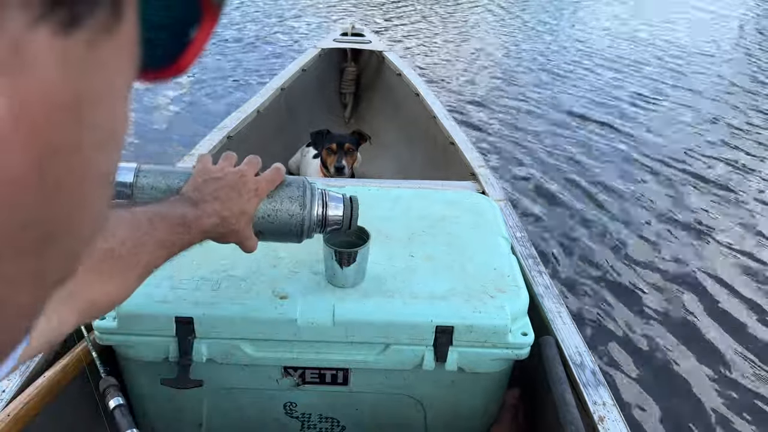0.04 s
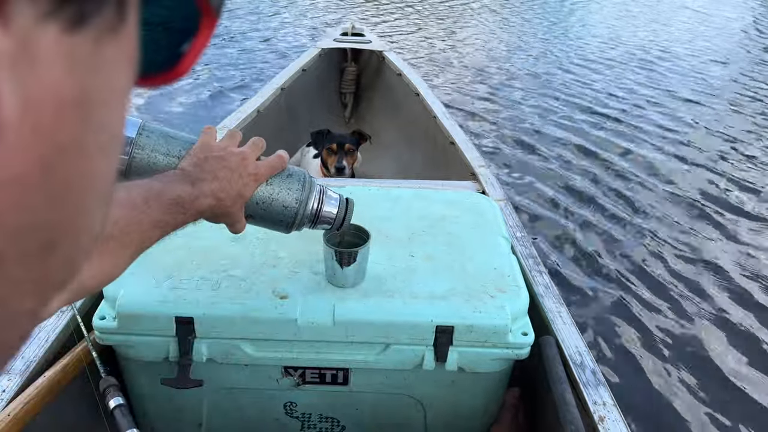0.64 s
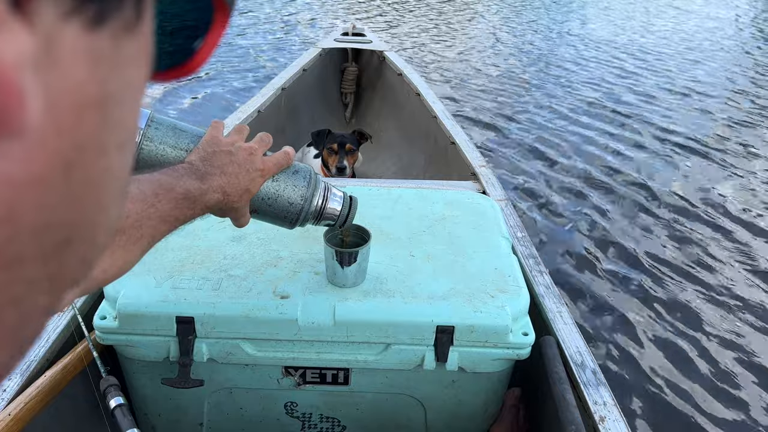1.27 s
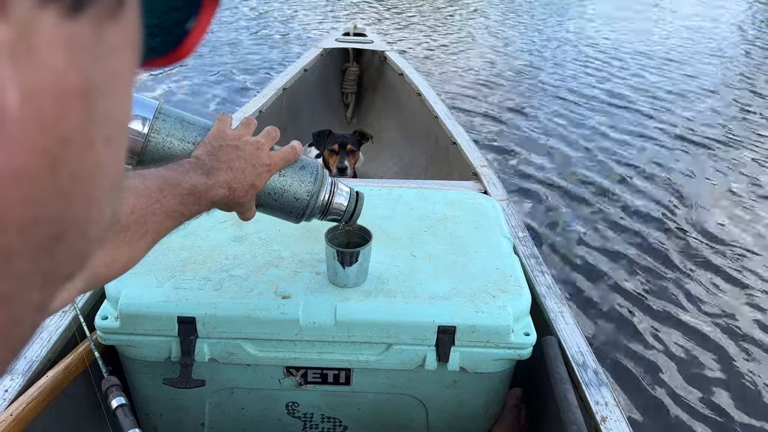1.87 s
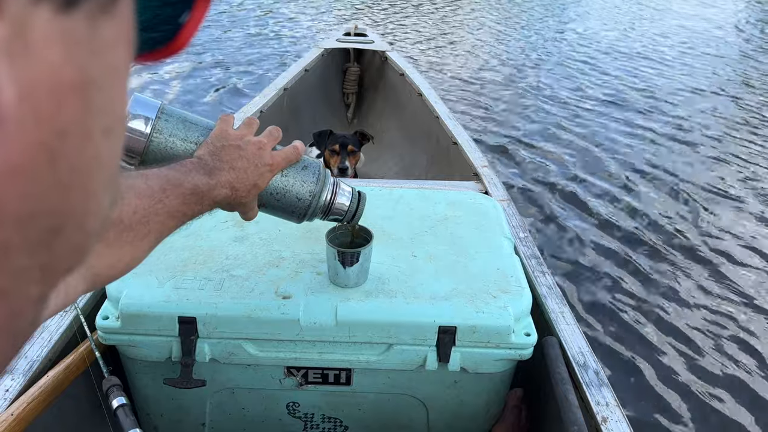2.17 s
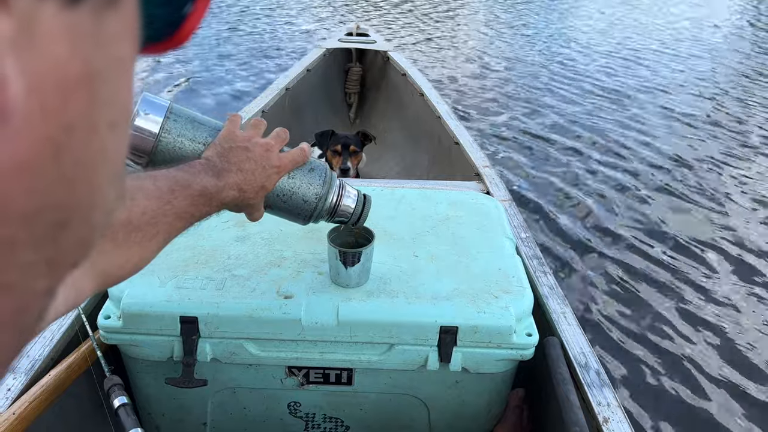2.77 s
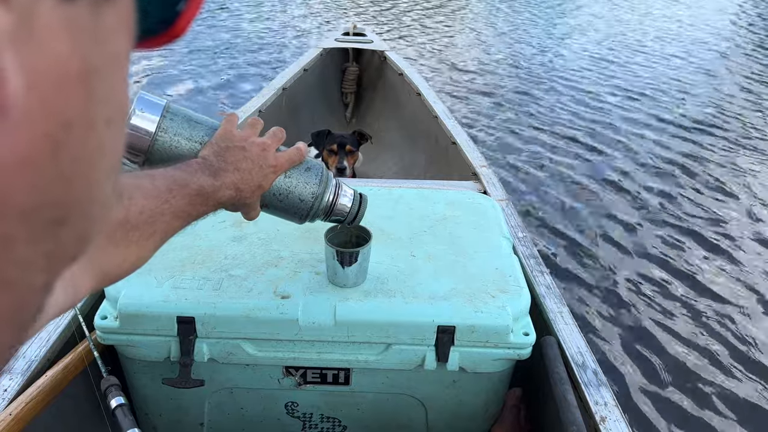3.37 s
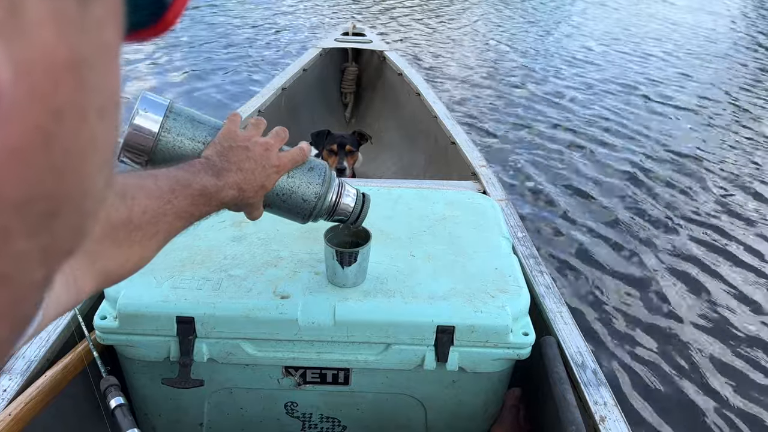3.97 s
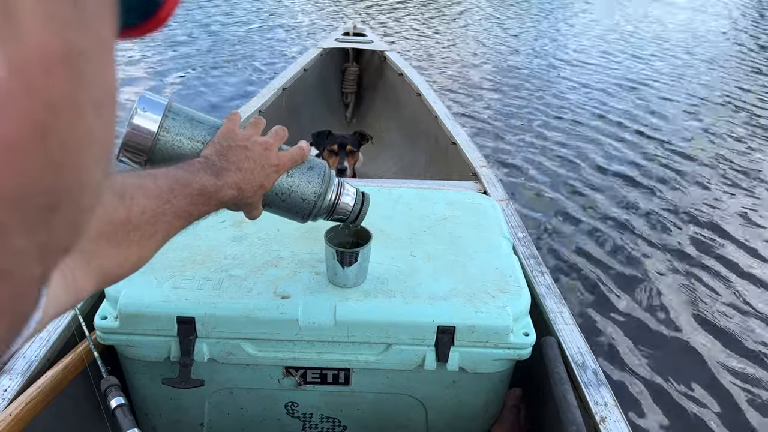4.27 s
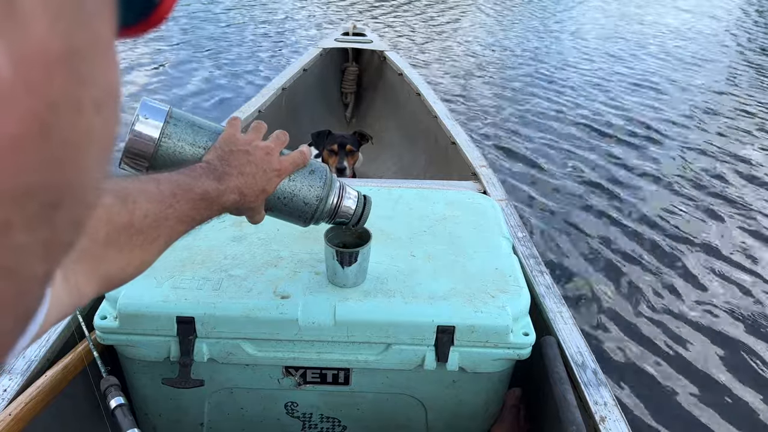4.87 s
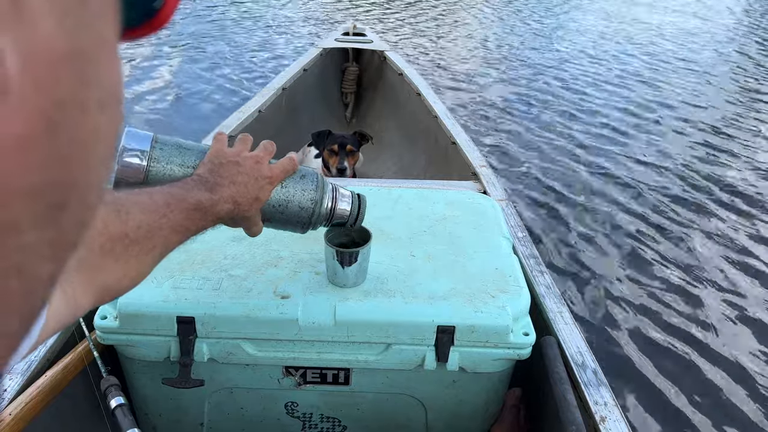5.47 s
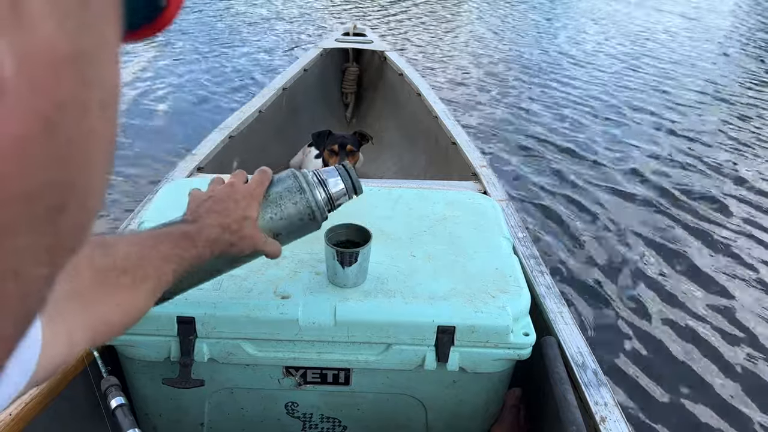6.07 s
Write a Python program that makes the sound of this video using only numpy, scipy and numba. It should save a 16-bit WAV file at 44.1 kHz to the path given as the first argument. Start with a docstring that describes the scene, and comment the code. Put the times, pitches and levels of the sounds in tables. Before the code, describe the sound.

A drink trickles from a flask into a small metal cup, plinking and gurgling, with wind rumbling on the microphone and faint insects.

```python
"""Coffee is poured in a thin stream from a steel flask into a small metal cup, in a canoe on a lake.
From the start, wind buffets the microphone while insects hiss and trill faintly on the shore.
After half a second the pour begins: trapped bubbles plink and gurgle, droplets tick, splashes spatter.
The cup's air column rings along and rises in pitch as the cup fills.
In the second half the wind gusts harder, and the stream thins out near the end."""
import sys
import numpy as np
from scipy import signal
from scipy.fft import rfft, irfft, next_fast_len
from scipy.io import wavfile
from numba import njit

SR = 44100
rng = np.random.default_rng(int(sys.argv[2]) if len(sys.argv) > 2 else 0)


def waveform_to_disk(signal):
    """Save audio, clipped to [-1, 1], as 16-bit WAV at the path in sys.argv[1]."""
    frames = np.transpose(np.atleast_2d(signal))
    scaled = np.clip(frames, -1, 1) * 32767
    samples = np.round(scaled).astype(np.int16)
    wavfile.write(sys.argv[1], SR, samples)


N = 274064
TIME = np.arange(N) / SR

# bed of rippled water and far trees, with a band of distant crickets: (frequency [Hz], gain [dB])
LAKE_EQ = [(300, 18.5), (800, -8), (1300, 5), (2200, 3), (3100, 1), (3500, 9), (3850, 14), (4250, -18),
           (6000, -24), (16000, -63)]
# airy insect chorus: (frequency [Hz], gain [dB])
CHORUS_EQ = [(2000, -35), (5200, -19.5), (7000, -12), (8000, 0.5), (9500, -3.5), (12800, 4.5), (14400, 6),
             (15800, 6.5), (17000, -39)]
# the chorus swells and eases off: (time [s], gain [dB])
CHORUS_FADER = [(0.1, 0), (0.27, -1.5), (0.5, 0.5), (0.82, -0.5), (1.02, 0.7), (1.8, 0.1), (2.15, -1),
                (2.65, 1), (3.05, -1), (3.47, 0), (4.07, -2.5), (4.47, 0.5), (4.72, -2), (5.03, -0.5),
                (5.45, -3), (6.0, -3.5), (6.2, -4)]
# thin whine of insects all round: (frequency [Hz], gain [dB])
WHINE_EQ = [(3000, -64), (5600, -32), (6000, 6.5), (6350, 13.5), (6900, 6.5), (9000, -99), (16000, 1)]
# the whine is strongest at first: (time [s], gain [dB])
WHINE_FADER = [(0.5, 2.5), (1.2, 1.5), (3.5, -1.5), (6.0, -0.5)]
# a far cricket trills about four times a second: (middle [s], level [dB], length [s])
TRILL_CUES = [(0.0, -54, 0.19), (0.216, -53.5, 0.19), (0.456, -48, 0.14), (0.711, -50, 0.15),
              (0.957, -52, .14), (1.214, -56, .16), (1.469, -54.5, .2), (1.739, -57.5, 0.19),
              (2.007, -58, .18), (2.269, -54.5, .18), (2.51, -53.5, 0.16), (2.834, -59, 0.16),
              (3.044, -56, 0.14), (3.305, -50.5, 0.12), (3.556, -49, 0.11), (3.797, -52, .12),
              (4.024, -55, 0.16), (4.244, -55.5, .14), (4.538, -56, 0.4), (4.866, -51, 0.17),
              (5.087, -60, .14), (5.307, -52.5, .16), (5.508, -52, .18), (5.788, -59, .15),
              (6.05, -51, .13)]

# the wind slackens, then gusts: (time [s], rumble level [dB], flutter level [dB])
WIND_FADERS = [(0.0, -31.5, -41.5), (0.3, -35.5, -46), (0.85, -34.5, -43.5), (1.2, -34.5, -45),
               (1.62, -38, -48), (1.92, -34, -44.5), (2.1, -39, -47.5), (2.45, -35.5, -46),
               (3.1, -40.5, -44.5), (3.68, -40.5, -48), (3.82, -31.5, -47.5), (3.98, -35.5, -48.5),
               (4.14, -28.5, -40.5), (4.25, -38.5, -53.5), (4.38, -27, -39), (4.66, -26.5, -36),
               (5.15, -31.5, -41.5), (5.35, -30.5, -39), (5.58, -33, -44.5), (5.85, -30, -38.5),
               (6.21, -34, -44)]
# low end of the wind: (frequency [Hz], gain [dB])
RUMBLE_EQ = [(15, -35), (25, -16.5), (38, -3), (55, 0.5), (85, -0.5), (130, -7), (200, -12), (350, -23),
             (700, -82)]
# low-mid flutter of fine turbulence: (frequency [Hz], gain [dB])
FLUTTER_EQ = [(80, -18), (160, -12.5), (230, -2.5), (350, -4.5), (500, -9), (700, -24), (1000, -42),
              (2000, -62)]
# the finer an eddy, the wider it sits in stereo: (frequency [Hz], side gain [dB])
EDDY_SIDE_EQ = [(100, -30), (250, -9.5), (500, -2), (800, 4)]
# the strongest eddies that hit the microphone: (time [s], level [dB], pitch [Hz])
BUFFET_CUES = [(0.02, -29, 306), (0.048, -31.5, 336), (0.113, -24.5, 120), (0.125, -31, 295),
               (0.139, -16.5, 82), (0.645, -26, 312), (0.753, -28.5, 256), (0.788, -22, 96),
               (0.989, -23.5, 99), (1.267, -20, 97), (2.317, -28.5, 306), (2.347, -25, 89.5),
               (2.44, -23.5, 70), (2.476, -29, 253), (2.548, -18.5, 90), (2.669, -24, 253),
               (2.693, -20.5, 138), (2.842, -29, 131), (3.078, -29, 266), (3.128, -34, 230),
               (3.165, -38, 280), (3.272, -27.5, 256), (3.479, -24.5, 178), (3.823, -18.5, 72),
               (3.933, -10, 148), (4.037, -18.5, 110), (4.122, -17, 124), (4.174, -25.5, 360),
               (4.379, -17.5, 170), (4.394, -15, 305), (4.408, -13, 104), (4.424, -27.5, 406),
               (4.434, -14.5, 75), (4.509, -17.5, 223), (4.518, -27, 397), (4.541, -29, 380),
               (4.566, -22, 424), (4.576, -16.5, 144), (4.591, -17, 370), (4.6, -8, 217), (4.611, -11, 140),
               (4.628, -16, 108), (4.657, -12.5, 84), (4.721, -18, 370), (4.729, -19.5, 300),
               (4.769, -17.5, 78.6), (4.807, -20, 258), (4.83, -17, 109), (4.841, -13.5, 76),
               (4.906, -21, 332), (4.93, -18, 95), (4.988, -18, 292), (5.025, -14, 80), (5.049, -14, 238),
               (5.13, -21, 210), (5.171, -22, 336), (5.189, -22.5, 107), (5.206, -20.5, 303),
               (5.254, -22, 308), (5.3, -27.5, 340), (5.319, -16.5, 87), (5.39, -23.5, 337),
               (5.799, -14, 110), (5.817, -16.5, 350), (5.913, -28, 333), (5.968, -15, 91),
               (6.143, -16.5, 65.4)]

# the pour spurts, steadies, surges, lulls, then thins: (time [s], level [dB])
FLOW_FADER = [(0.5, -66.5), (0.7, -66), (0.87, -76.5), (1.02, -70), (1.4, -66.5), (1.7, -65.5), (2.05, -65),
              (2.48, -66), (2.72, -69), (3.1, -60), (3.35, -62.5), (3.46, -62.5), (3.6, -60), (3.72, -62),
              (3.8, -57.5), (4.0, -67), (4.15, -58.5), (4.25, -74), (4.33, -63), (4.4, -66.5), (5.0, -63),
              (5.42, -65.5), (5.6, -66), (5.8, -61), (6.0, -80)]
# air column above the coffee: (time [s], resonance [Hz])
CUP_RESONANCE = [(0.5, 1115), (1.6, 1250), (2.6, 1217), (3.6, 1410), (4.6, 1510), (5.9, 1610)]
# tone of splashes inside the cup: (frequency [Hz], gain [dB])
SPATTER_EQ = [(400, -5.5), (750, -23), (1400, -6), (2100, 3), (3000, 2.5), (3700, 11.5), (4300, 4.5),
              (5500, 3), (7500, 12), (11000, -19), (16000, -68)]
# the stream breaks up and splashes: (time [s], spray level [dB], gurgle level [dB], length [s])
SPLASH_CUES = [(0.725, -54.5, -64, 0.039), (0.783, -68, -71, 0.013), (1.102, -49, -62, 0.006),
               (1.121, -49.5, -56, 0.013), (1.254, -57, -66, 0.014), (1.558, -57, -41, 0.005),
               (1.608, -47.5, -45, 0.007), (1.753, -50.5, -55, 0.018), (1.847, -52.5, -39.5, 0.016),
               (2.028, -48, -59, 0.0059), (2.132, -61, -53.5, 0.06), (2.251, -68, -50, 0.0082),
               (2.313, -59, -50, 0.012), (2.401, -74, -50, 0.028), (2.484, -60, -42.5, 0.0087),
               (2.536, -56, -49, 0.03), (2.81, -50, -44.5, 0.015), (2.763, -54, -62, 0.0054),
               (2.853, -53.5, -50.5, 0.029), (3.03, -54, -56, 0.008), (2.997, -55, -41.5, 0.0064),
               (3.107, -62, -44.5, 0.013), (3.225, -48, -43, 0.0079), (3.263, -51, -37.5, 0.0069),
               (3.311, -62, -52, 0.012), (3.375, -53, -45, 0.0076), (3.478, -55, -37, 0.0077),
               (3.523, -42, -45, 0.0035), (3.555, -54, -47, 0.013), (3.575, -47, -48, 0.019),
               (3.607, -58, -47, 0.018), (3.758, -39.5, -38, 0.012), (3.804, -49, -50, 0.01),
               (3.837, -49, -33.5, 0.0046), (4.162, -63, -52, 0.019), (4.284, -37.5, -52, 0.0067),
               (4.349, -55, -38, 0.008), (4.417, -59, -50, 0.014), (4.44, -44, -52, 0.0067),
               (4.509, -60, -45, 0.011), (4.548, -51, -47, 0.0081), (4.699, -76, -44, 0.018),
               (4.792, -52, -45, 0.017), (5.051, -61.5, -47.5, 0.015), (5.172, -55, -46.5, 0.018),
               (5.232, -59, -46, 0.018), (5.383, -65, -49.5, 0.018), (5.484, -58.5, -49, 0.026)]
# the sharpest droplets ticking on the surface and the wall: (time [s], level [dB], pitch [Hz])
DROPLET_CUES = [(0.583, -35.5, 3530), (0.897, -37, 2720), (0.978, -36.5, 7450), (1.264, -35, 3510),
                (1.457, -34.5, 7900), (1.498, -38, 3260), (1.584, -38, 2790), (1.61, -38, 2320),
                (1.847, -36, 3510), (1.912, -41, 3280), (2.142, -40, 2560), (2.313, -42, 3320),
                (2.449, -39, 2260), (2.493, -35, 3500), (2.539, -40, 4700), (2.866, -43, 2420),
                (2.643, -38, 3630), (3.108, -34, 7350), (3.307, -32, 5700), (3.482, -33, 7250),
                (3.513, -26.5, 3240), (3.514, -41, 2300), (3.546, -34, 6300), (3.579, -31, 2980),
                (3.76, -32.5, 3630), (3.84, -28.5, 2970), (4.013, -35.5, 7440), (4.213, -35.5, 3400),
                (4.285, -38, 9200), (4.444, -39, 4200), (4.655, -41.5, 3320), (4.89, -34, 6600),
                (5.118, -39, 7000), (5.147, -40, 2680), (5.498, -36, 2650)]
# snap of a bubble pinching off inside the cup: (frequency [Hz], gain [dB])
SNAP_EQ = [(300, -33), (700, -36), (1300, 20), (2100, -2), (3600, -8.5), (4600, -6), (7500, -17),
           (16000, -47)]
# the largest trapped bubbles: (time [s], level [dB], pitch [Hz], t60 [s], glide [share of pitch])
BUBBLE_CUES = [(0.596, -45, 1130, 0.065, 0.1), (0.618, -41, 1085, 0.064, -0.21),
               (0.644, -44, 1150, 0.032, -0.42), (0.671, -37, 1086, 0.048, -0.14),
               (0.979, -41, 1390, 0.023, -0.022), (0.987, -36, 1130, 0.039, -0.16),
               (1.0, -40.5, 1010, 0.024, -0.049), (1.055, -49, 1310, 0.025, -0.2),
               (1.068, -39.5, 1083, 0.07, 0.0058), (1.126, -37, 1350, 0.047, 0.11),
               (1.191, -42.5, 1290, 0.031, 0.31), (1.204, -42, 1240, 0.045, 0.52),
               (1.241, -41.5, 1510, 0.008, 0.25), (1.262, -42, 1100, 0.044, 0.4),
               (1.331, -41.5, 1560, 0.021, 0), (1.458, -40, 1210, 0.037, 0.43),
               (1.511, -31, 1170, 0.042, 0.074), (1.56, -30.5, 1086, 0.075, -0.1),
               (1.581, -45, 1420, 0.025, 0), (1.603, -34, 966, 0.035, 0.1),
               (1.61, -32, 1780, 0.033, -0.023), (1.612, -42, 1230, 0.098, -0.2),
               (1.619, -38, 1040, 0.092, 0), (1.655, -38, 1090, 0.031, 0.19),
               (1.665, -46, 1000, 0.041, 0.39), (1.712, -39.5, 1195, 0.042, 0.049),
               (1.73, -28.5, 1186, 0.055, 0.031), (1.757, -48, 1570, 0.06, -0.062),
               (1.771, -32.5, 1236, 0.03, 0.11), (1.849, -29.5, 1057, 0.03, -0.082),
               (1.855, -34, 890, 0.064, 0.19), (1.857, -39.5, 1357, 0.091, 0.039),
               (1.887, -29.5, 1254, 0.02, 0.069), (1.96, -35.5, 826, 0.061, 0.11),
               (2.027, -35, 1075, 0.013, 0.57), (2.1, -35.5, 1180, 0.016, 0.32),
               (2.123, -25, 1014, 0.021, 1.0), (2.124, -54, 990, 0.064, 0.61),
               (2.354, -30, 975, 0.03, 0.88), (2.361, -29.5, 1156, 0.027, 0.77),
               (2.539, -35, 770, 0.0064, 0.33), (2.612, -27.5, 1280, 0.027, 0.44),
               (2.623, -48, 1340, 0.024, 0.054), (2.643, -28, 1270, 0.035, 0.064),
               (2.703, -37, 980, 0.037, 0.35), (2.812, -32.5, 1220, 0.011, 0.57),
               (2.949, -40, 1250, 0.057, 0.32), (3.031, -26.5, 1400, 0.04, 0.11),
               (3.107, -36, 770, 0.053, -0.4), (3.108, -39.5, 1380, 0.02, -0.098),
               (3.134, -34, 1720, 0.008, -0.082), (3.151, -31, 1140, 0.013, -0.057),
               (3.19, -47, 1900, 0.0098, 0.14), (3.206, -37.5, 1300, 0.02, 0.022),
               (3.23, -28.5, 1387, 0.039, 0), (3.264, -51, 1690, 0.015, 0.17),
               (3.291, -40, 1400, 0.066, 0.077), (3.323, -30, 1320, 0.035, 0.11),
               (3.376, -35, 1360, 0.022, 0.23), (3.379, -35.5, 740, 0.026, -0.29),
               (3.481, -35, 1080, 0.069, -0.081), (3.512, -37, 976, 0.061, 0.022),
               (3.552, -30, 1287, 0.057, 0.52), (3.585, -37, 1440, 0.03, -0.19),
               (3.62, -36, 1420, 0.047, -0.052), (3.66, -42, 1420, 0.048, -0.11),
               (3.694, -41, 1690, 0.033, -0.24), (3.718, -33.5, 1400, 0.045, 0.25),
               (3.765, -37, 1360, 0.034, 0.2), (3.809, -35.5, 2190, 0.02, -0.31),
               (3.831, -38, 1090, 0.0069, 0.2), (3.84, -32, 1455, 0.029, 0.05),
               (3.855, -41, 1403, 0.057, -0.25), (3.903, -41, 1370, 0.052, 0.3),
               (3.944, -39.5, 1370, 0.037, 0.44), (3.984, -43, 1470, 0.033, 0.24),
               (4.115, -45, 1470, 0.036, 0.11), (4.285, -30, 1356, 0.048, 0.25),
               (4.351, -29, 1104, 0.035, 0.0046), (4.382, -39, 1340, 0.014, 0.2),
               (4.508, -34.5, 1516, 0.034, -0.097), (4.555, -37, 1410, 0.043, -0.32),
               (4.579, -39.5, 1830, 0.055, -0.18), (4.662, -41, 1480, 0.031, 0.031),
               (4.698, -36, 1496, 0.053, 0.1), (4.715, -32.5, 2340, 0.014, 0.65),
               (4.793, -36.5, 840, 0.069, -0.16), (4.823, -37.5, 2260, 0.022, -0.36),
               (4.956, -37, 1450, 0.099, -0.37), (5.042, -39, 760, 0.054, -0.67),
               (5.173, -43, 1460, 0.033, 0.28), (5.177, -42, 1170, 0.037, 0.062),
               (5.233, -39.5, 1050, 0.052, -0.28), (5.342, -34.5, 1410, 0.0095, -0.18),
               (5.38, -43, 2450, 0.028, 0.3), (5.47, -39, 1040, 0.019, -0.32),
               (5.496, -41.5, 860, 0.056, -0.25), (5.711, -36.5, 1850, 0.02, 0.84),
               (5.713, -42.5, 1220, 0.036, -0.14), (5.876, -40.5, 1510, 0.065, -0.25)]


def undb(db):
    """Decibels to gain."""
    return 10 ** (np.asarray(db) / 20)


def unit(x):
    """Scale to rms 1."""
    return x / np.sqrt(np.mean(x ** 2))


def curves(table):
    """One automation curve per column, in straight lines between the table's times."""
    s, *columns = np.transpose(table)
    return [np.interp(TIME, s, column) for column in columns]


def equalise(x, eq, size=8192):
    """Minimum-phase EQ through the points (frequency [Hz], gain [dB])."""
    hz, db = np.transpose(eq)
    bins_hz = np.maximum(np.arange(size // 2 + 1) * SR / size, 1)
    gain = undb(np.interp(np.log(bins_hz), np.log(hz), db))
    cepstrum = irfft(np.log(gain))
    cepstrum[1:size // 2] *= 2
    cepstrum[size // 2 + 1:] = 0
    return signal.oaconvolve(x, irfft(np.exp(rfft(cepstrum))))[:N]


def noise(eq, envelope=1):
    """Coloured noise of rms 1, optionally driven in bursts."""
    return unit(equalise(envelope * rng.standard_normal(N), eq))


def wobble(rate_hz):
    """Bounded random modulation with a spread near 1; holds after its last knot."""
    knots = np.clip(rng.standard_normal(2048), -1.8, 1.8)
    return 1.39 * np.interp(TIME * rate_hz, np.arange(len(knots)), knots)


def add(track, s, sound):
    """Mix a sound into a track at time s."""
    i = int(np.clip(s * SR, 0, N - 1))
    track[i:i + len(sound)] += sound[:N - i]


def delay(x, s):
    """The same sound s seconds later."""
    size = next_fast_len(N + 64)
    shift = np.exp(-2j * np.pi * s * SR * np.arange(size // 2 + 1) / size)
    return irfft(rfft(x, size) * shift, size)[:N]


def stereo(mid, side):
    """Left and right from mid and side."""
    return np.array([mid + side, mid - side])


@njit
def resonate(x, hz, width_hz):
    """Swept band-pass, gain 1 at its centre."""
    out, band_state, low_state = np.empty(len(x)), 0., 0.
    for i in range(len(x)):
        tuning, damping = np.tan(np.pi * hz[i] / SR), width_hz / hz[i]
        band = (band_state + tuning * (x[i] + 1e-18 - low_state)) / (1 + tuning * (tuning + damping))
        band_state = 2 * band - band_state
        low_state += 2 * tuning * band
        out[i] = damping * band
    return out


def echoes(x, t60):
    """Dense decaying reflections, unrelated left and right, as strong as the sound itself."""
    t = TIME[:8000]
    scatter = rng.standard_normal((2, len(t))) * np.exp(-np.log(1000) * t / t60) * (t > .003)
    scatter /= np.sqrt(np.sum(scatter ** 2, axis=1, keepdims=True))
    return signal.oaconvolve(x[None], scatter, axes=1)[:, :N]


def shore_bed(chorus_db=-52.5, diffuse_db=-12, whine_db=-64, lake_db=-63.5, lag_s=0.0001471):
    """Insect hiss from one shore arrives on the right first; a whine and lake rustle lie all round."""
    chorus_ride_db, = curves(CHORUS_FADER)
    whine_ride_db, = curves(WHINE_FADER)
    direct = noise(CHORUS_EQ)
    diffuse = np.array([noise(CHORUS_EQ), noise(CHORUS_EQ)])
    chorus = np.array([delay(direct, lag_s), direct]) + undb(diffuse_db) * diffuse
    whine = np.array([noise(WHINE_EQ), noise(WHINE_EQ)])
    lake = np.array([noise(LAKE_EQ), noise(LAKE_EQ)])
    rasp_db = 1.15 * wobble(150)
    return (undb(chorus_db + chorus_ride_db + rasp_db) * chorus
            + undb(whine_db + whine_ride_db) * whine
            + undb(lake_db + wobble(4.4)) * lake)


def cricket(stroke_hz=50, pitch_hz=3770, fall_hz_per_s=45000, stroke_s=0.0035, jitter_s=0.0012):
    """Each wing stroke is a raspy falling chirp; every trill swells and fades, blurred by the trees."""
    song = np.zeros(N)
    t = np.arange(-3 * stroke_s, 3 * stroke_s, 1 / SR)
    for middle, db, length in TRILL_CUES:
        start = middle - length / 2
        strokes = np.arange(max(start, 0), start + length, 1 / stroke_hz)
        for s, (detune, accent_db, late) in zip(strokes, rng.standard_normal((20, 3))):
            swell = np.sin(np.pi * (.15 + .7 * (s - start) / length))
            envelope = undb(db + accent_db) * swell * np.exp(-.5 * (t / stroke_s) ** 2)
            phase = 2 * np.pi * (pitch_hz * (1 + 0.013 * detune) * t - fall_hz_per_s * t ** 2 / 2)
            add(song, s + t[0] / 2 + jitter_s * late, envelope * np.sin(phase))
    song *= 1 + .3 * wobble(400)  # rasp
    return np.array([song, delay(song, .00006)]) + undb(-7) * echoes(song, t60=0.17)


def wind(rumble_trim_db=2.5, flutter_trim_db=-1.5, swell_db=2.0, burst_db=5.0, narrow_from_db=-33):
    """Turbulence on the microphone: a deep rumble, and finer eddies that flutter in short bursts."""
    rumble_db, flutter_db = curves(WIND_FADERS)
    swell = undb(swell_db * wobble(16))
    bursts = swell * undb(burst_db * wobble(55))
    # the rumble narrows towards the centre as it gets louder
    side_db = -10 - np.clip(14 * (rumble_db - narrow_from_db), 0, 6)
    rumble = stereo(noise(RUMBLE_EQ, swell), undb(side_db) * noise(RUMBLE_EQ, swell))
    flutter = stereo(noise(FLUTTER_EQ, bursts), equalise(noise(FLUTTER_EQ, bursts), EDDY_SIDE_EQ))
    return undb(rumble_db + rumble_trim_db) * rumble + undb(flutter_db + flutter_trim_db) * flutter


def small_eddies(count, above_db=9, scatter_db=3, low_hz=190, high_hz=380):
    """Extra buffet cues at uneven intervals, their level riding the fine turbulence."""
    _, flutter_db = curves(WIND_FADERS)
    place, size, pitch = rng.random((count, 3)).T
    when = (np.arange(count) + place) / count * N / SR
    db = np.interp(when, TIME, flutter_db) + above_db + scatter_db * (2 * size - 1)
    return np.column_stack([when, db, low_hz * (high_hz / low_hz) ** pitch])


def buffets(push_cycles=0.16, width_share=0.74, side_db=-22):
    """A single eddy is a soft push of pressure that rebounds once or twice: a dull knock."""
    out = np.zeros(N)
    cues = np.vstack([BUFFET_CUES, small_eddies(count=70)])
    for (s, db, hz), polarity in zip(cues, np.sign(rng.standard_normal(len(cues)))):
        cycles = np.arange(-1 / hz, 5 / hz, 1 / SR) * hz
        push = np.exp(-.5 * (cycles / push_cycles) ** 2)
        knock = resonate(push, np.full(len(cycles), hz), width_share * hz)
        add(out, s - 1.267 / hz, polarity * undb(db) * knock / np.abs(knock).max())
    return stereo(out, undb(side_db) * delay(out, 0.0017))


def canoe(x, left_db=-0.5, right_db=-5.0, lag_s=.00004, echo_db=-11):
    """The cup sits a little to the left; lid and hull scatter brief echoes."""
    direct = np.array([undb(left_db) * x, undb(right_db) * delay(x, lag_s)])
    return direct + undb(echo_db) * echoes(x, t60=0.065)


def pour(start_s=.53, end_s=6.6, attack_s=0.027, release_s=0.34, full_cup_db=-25):
    """The stream's level, the loss of ring as the coffee nears the rim, and the pour's gate."""
    flow_db, = curves(FLOW_FADER)
    fill = np.clip((TIME - start_s) / (end_s - start_s), 0, 1)
    damping_db = full_cup_db * fill ** 5.4  # sets in late
    gate = np.clip(np.minimum((TIME - start_s) / attack_s, (end_s - TIME) / release_s), 0, 1)
    return flow_db, damping_db, gate


@njit
def grains(start, hz, t60, size, glide):
    """Decaying sines that swell over their first cycle and glide upwards."""
    out = np.zeros(N)
    for k in range(len(start)):
        first, length = int(start[k] * SR), int(t60[k] * SR)
        step = 2j * np.pi * hz[k] / SR
        phasor = size[k] + 0j
        pole = np.exp(step - np.log(1000) / length)
        bend = np.exp(step * glide / length)
        for i in range(min(length, N - first)):
            out[first + i] += phasor.imag * min(1., i * hz[k] / SR)
            phasor *= pole
            pole *= bend
    return out


def swarm(count, low_hz, high_hz, cycles, spread_db, glide=.1):
    """A texture of small bubbles, random in timing, pitch, loudness and ring."""
    when, pitch, size, ring = rng.random((count, 4)).T
    hz = low_hz * (high_hz / low_hz) ** pitch
    loudness = undb(-spread_db * np.log(np.maximum(size, .05)))
    t60 = (.5 + ring) * cycles / hz
    return unit(grains(when * N / SR, hz, t60, loudness, glide))


def stream(air_hz, gurgle_db=1.0, spatter_db=2.5, glug_db=-4.0, fizz_db=-8, froth_db=-4):
    """Bubbles gurgle in the cup's air; deeper ones glug, finer ones spatter and fizz over froth."""
    flow_db, damping_db, gate = pour()
    small = swarm(count=2600, low_hz=750, high_hz=2400, cycles=24, spread_db=3.5)
    deep = swarm(count=1400, low_hz=650, high_hz=1200, cycles=28, spread_db=4)
    gurgle = unit(resonate(small, air_hz, width_hz=650)) + undb(glug_db) * deep
    fine = swarm(count=2000, low_hz=1100, high_hz=3500, cycles=40, spread_db=5)
    fizz = swarm(count=700, low_hz=3430, high_hz=11300, cycles=81, spread_db=13)
    froth = noise(SPATTER_EQ, undb(6.4 * wobble(30)))
    spatter = unit(equalise(fine, SPATTER_EQ)) + undb(fizz_db) * unit(equalise(fizz, SPATTER_EQ))
    spatter += undb(froth_db) * froth
    return gate * undb(flow_db) * (undb(gurgle_db + damping_db) * gurgle + undb(spatter_db) * spatter)


def splashes(air_hz, attack_s=0.00017):
    """A splash is a short, dense burst of tiny bubbles over larger ones that gurgle in the cup's air."""
    spray_envelope, gurgle_envelope = np.zeros(N), np.zeros(N)
    for s, spray_db, gurgle_db, length in SPLASH_CUES:
        t = TIME[:int(3 * length * SR)]
        burst = (1 - np.exp(-t / attack_s)) * np.exp(-(t / length) ** 2)
        add(spray_envelope, s, undb(spray_db) * burst)
        add(gurgle_envelope, s, undb(gurgle_db) * burst)
    spray = swarm(count=5000, low_hz=814, high_hz=9600, cycles=19, spread_db=-5.5, glide=0.067)
    gurgle = swarm(count=5000, low_hz=817, high_hz=2850, cycles=27, spread_db=2.5, glide=0.081)
    return (spray_envelope * unit(equalise(spray, SPATTER_EQ))
            + gurgle_envelope * unit(resonate(gurgle, air_hz, width_hz=1100)))


def bubble(hz, t60, glide, attack_s):
    """A ringing pocket of air; a positive glide lifts its pitch as it nears the surface."""
    t = np.arange(int((t60 + 3 * attack_s) * SR) + 8) / SR
    envelope = (1 - np.exp(-(t / attack_s) ** 2)) * np.exp(-np.log(1000) * t / t60)
    return envelope / envelope.max() * np.sin(2 * np.pi * hz * (t + glide * t ** 2 / (2 * t60)))


def droplets(click_db=-11, click_s=0.0024):
    """Each droplet lands with a sharp click and the brief ring of a tiny bubble."""
    out = np.zeros(N)
    click_decay = np.exp(-TIME[:300] / click_s)
    for s, db, hz in DROPLET_CUES:
        add(out, s, undb(db) * bubble(hz, t60=0.014, glide=0.27, attack_s=0.0001))
        add(out, s, undb(db + click_db) * rng.standard_normal(len(click_decay)) * click_decay)
    return out


def lesser_bubbles(air_hz, count, start_s=.53, end_s=6.6, above_db=17, scatter_db=2, ring_cycles=64):
    """Extra bubble cues at uneven intervals, riding the flow and pitched near the cup's resonance."""
    flow_db, damping_db, _ = pour()
    when = start_s + (end_s - start_s) * (np.arange(count) + rng.random(count)) / count
    size, detune = np.clip(rng.standard_normal((count, 2)), -2, 2).T
    db = np.interp(when, TIME, flow_db + damping_db) + above_db + scatter_db * size
    hz = np.interp(when, TIME, air_hz) * 2 ** (0.214 * detune)
    glide = 0.12 * rng.random(count)
    return np.column_stack([when, db, hz, ring_cycles / hz, glide])


def plinks(air_hz, roughness_db=0.9, ring_db=-12, snap_db=-15, snap_s=0.0087, shed_db=-12):
    """Each large bubble snaps off, rings and sheds a softer one; the cup's air rings along."""
    rings, snaps = np.zeros(N), np.zeros(N)
    snap_decay = np.exp(-TIME[:900] / snap_s)
    cues = np.vstack([BUBBLE_CUES, lesser_bubbles(air_hz, count=64)])
    for (s, db, hz, t60, glide), (lag, detune) in zip(cues, rng.random((len(cues), 2))):
        add(rings, s, undb(db) * bubble(hz, t60, glide, attack_s=1 / hz))
        shed_hz = hz * (0.86 + 0.41 * detune)
        shed = bubble(shed_hz, t60=45 / shed_hz, glide=0.039, attack_s=0.000081)
        add(rings, s + 0.0092 + 0.024 * lag, undb(db + shed_db) * shed)
        add(snaps, s, undb(db + snap_db) * rng.standard_normal(len(snap_decay)) * snap_decay)
    rings *= undb(roughness_db * wobble(420))  # a fast, slight flutter roughens each bubble's ring
    return rings + undb(ring_db) * resonate(rings, air_hz, width_hz=120) + equalise(snaps, SNAP_EQ)


def scene(droplet_db=-1):
    """The mix: the pour up front in the canoe, with wind and insects around it."""
    air_hz, = curves(CUP_RESONANCE)
    coffee = plinks(air_hz) + undb(droplet_db) * droplets() + splashes(air_hz) + stream(air_hz)
    return canoe(coffee) + wind() + buffets() + cricket() + shore_bed()


def record(dry):
    """A low cut on the deepest bass and a steep high cut on the very top."""
    dry = signal.sosfilt(signal.butter(4, 34, "high", fs=SR, output="sos"), dry)
    return signal.sosfilt(signal.ellip(10, .2, 80, 15850, fs=SR, output="sos"), dry)


dry = scene()
out = record(dry)
waveform_to_disk(out)
```